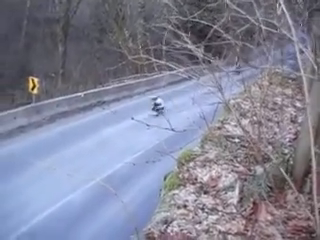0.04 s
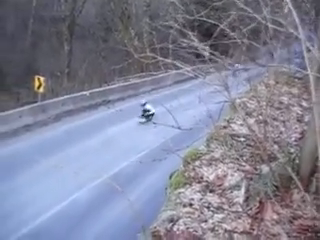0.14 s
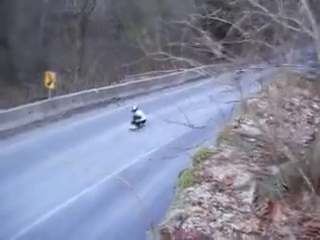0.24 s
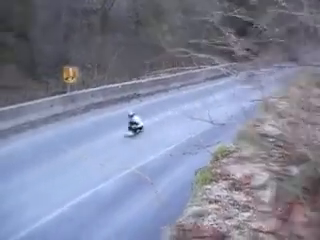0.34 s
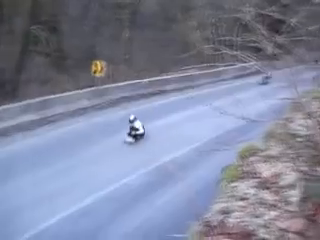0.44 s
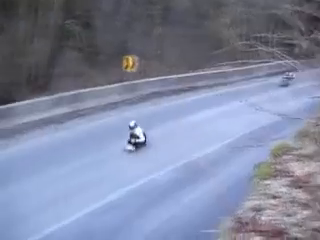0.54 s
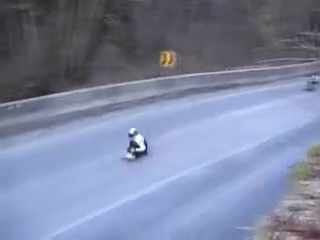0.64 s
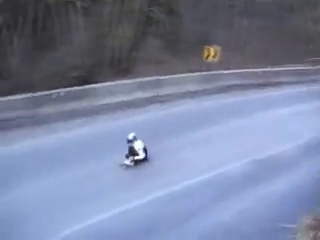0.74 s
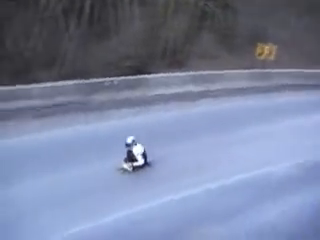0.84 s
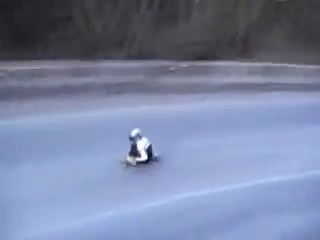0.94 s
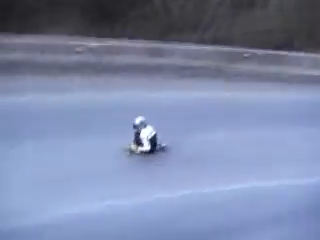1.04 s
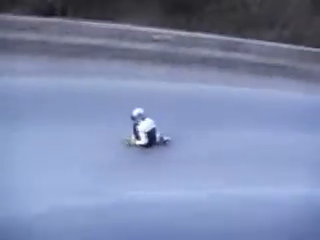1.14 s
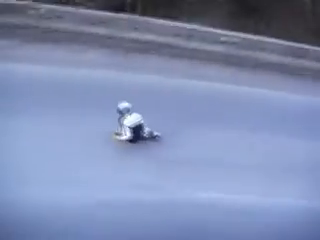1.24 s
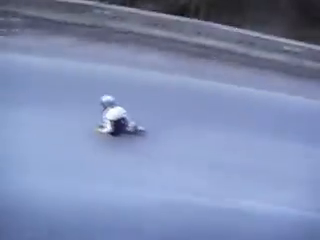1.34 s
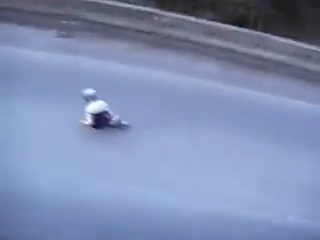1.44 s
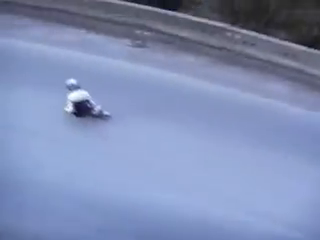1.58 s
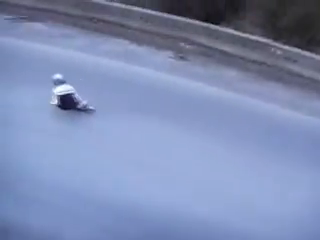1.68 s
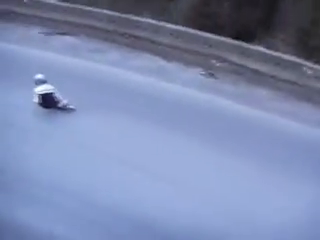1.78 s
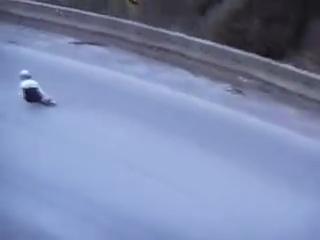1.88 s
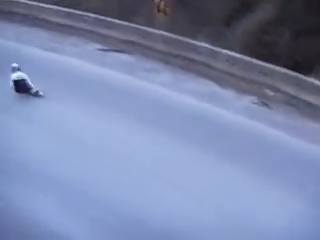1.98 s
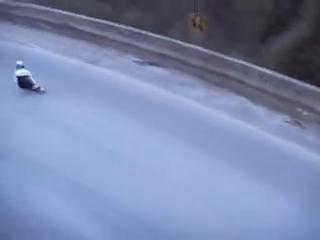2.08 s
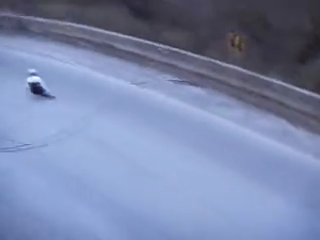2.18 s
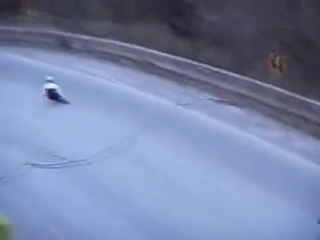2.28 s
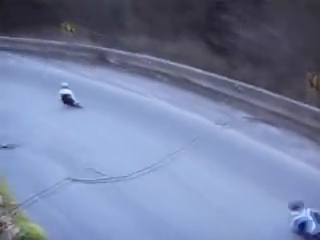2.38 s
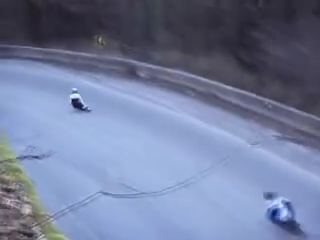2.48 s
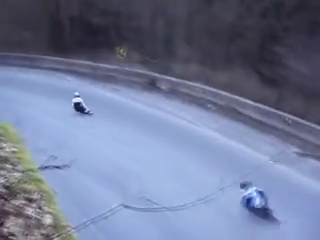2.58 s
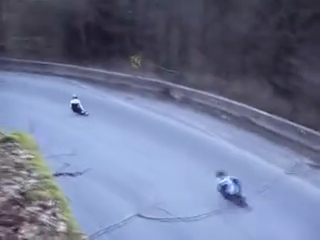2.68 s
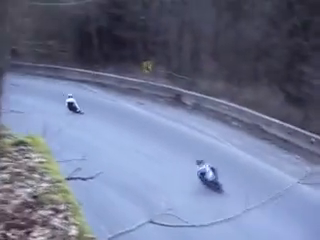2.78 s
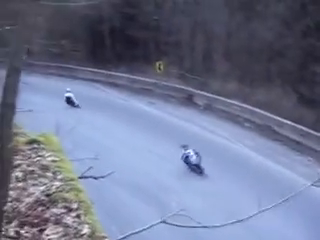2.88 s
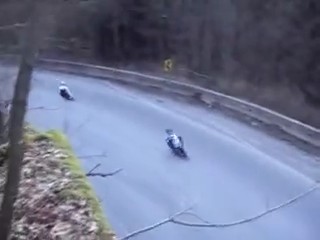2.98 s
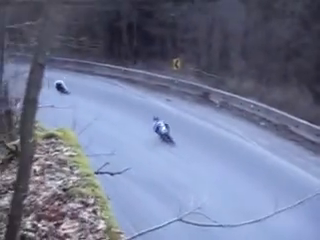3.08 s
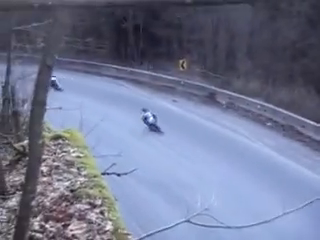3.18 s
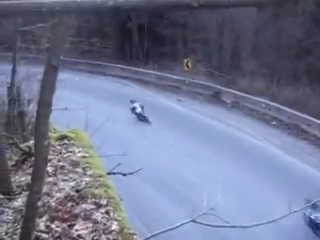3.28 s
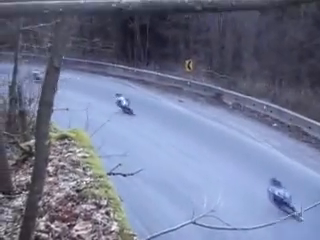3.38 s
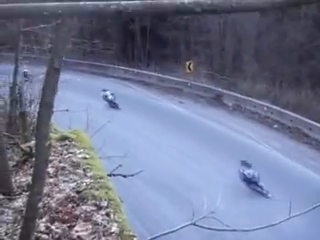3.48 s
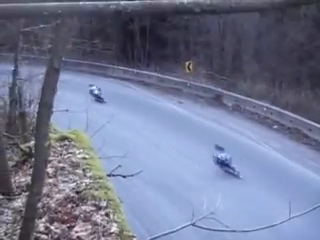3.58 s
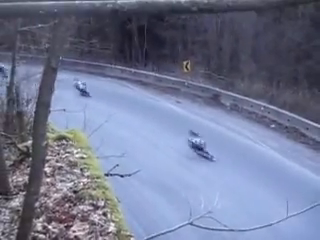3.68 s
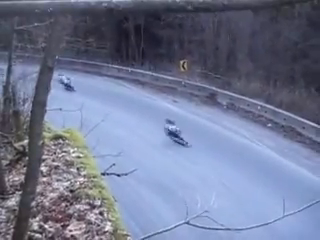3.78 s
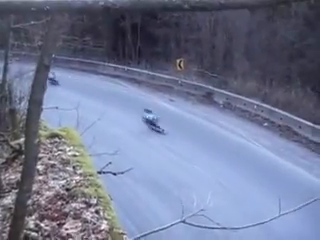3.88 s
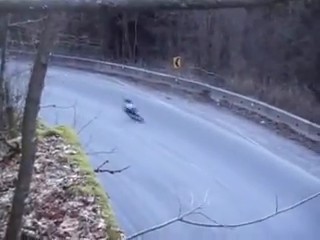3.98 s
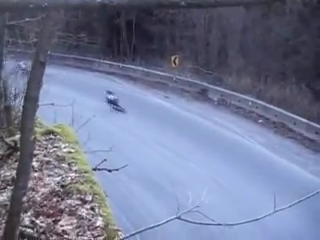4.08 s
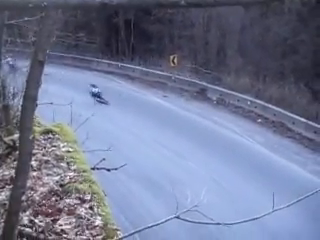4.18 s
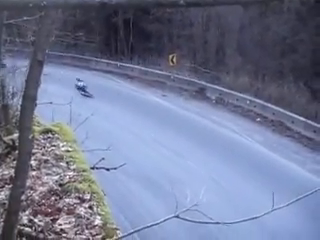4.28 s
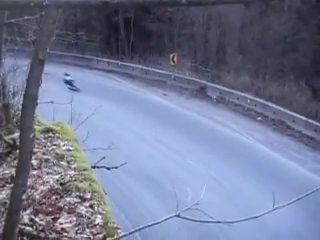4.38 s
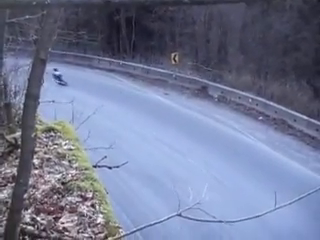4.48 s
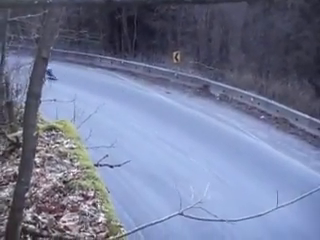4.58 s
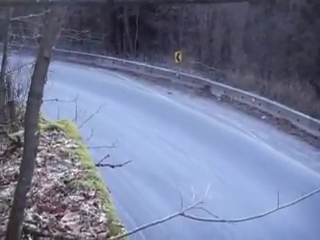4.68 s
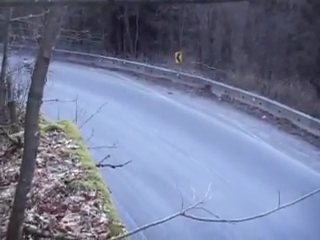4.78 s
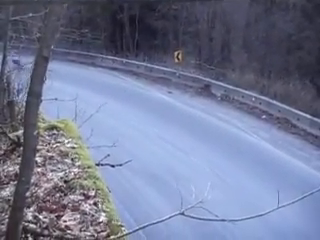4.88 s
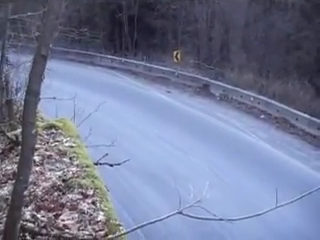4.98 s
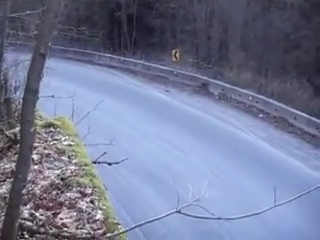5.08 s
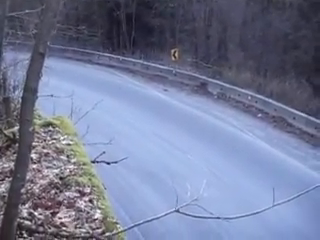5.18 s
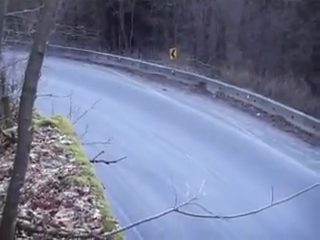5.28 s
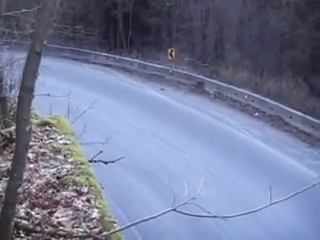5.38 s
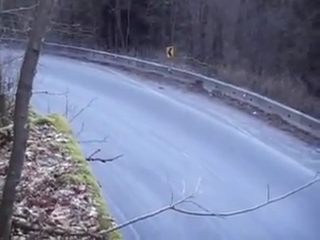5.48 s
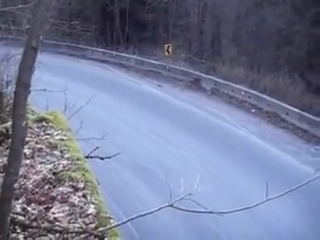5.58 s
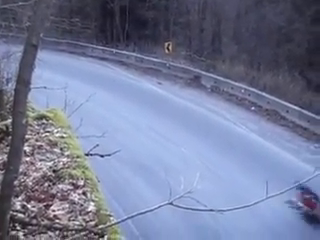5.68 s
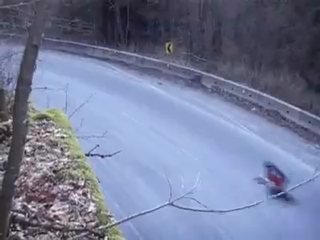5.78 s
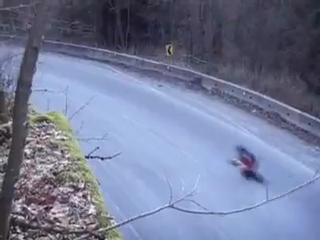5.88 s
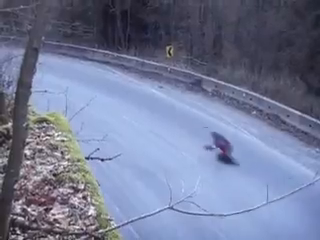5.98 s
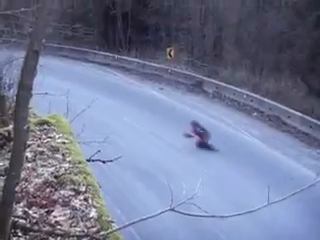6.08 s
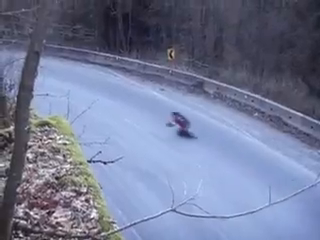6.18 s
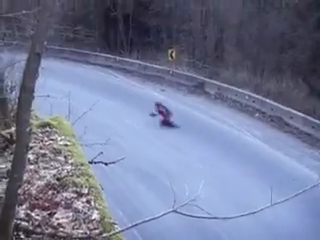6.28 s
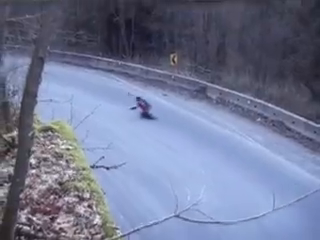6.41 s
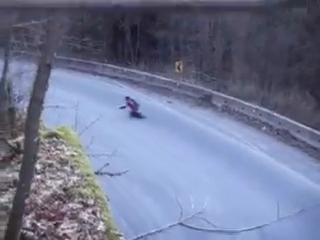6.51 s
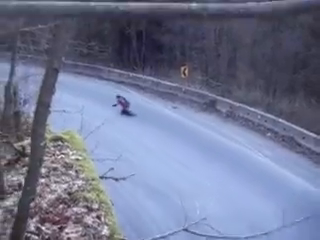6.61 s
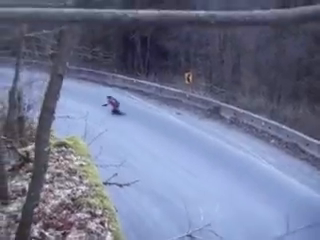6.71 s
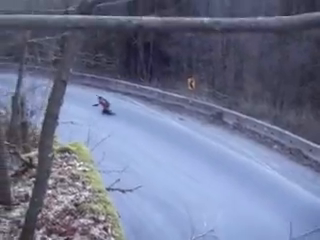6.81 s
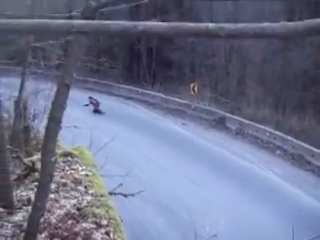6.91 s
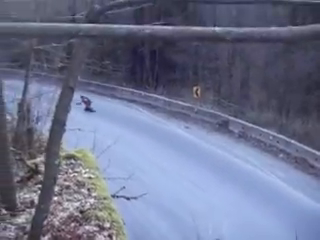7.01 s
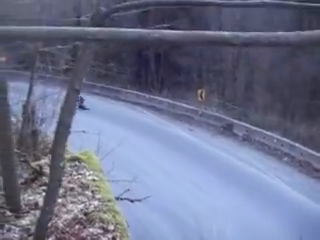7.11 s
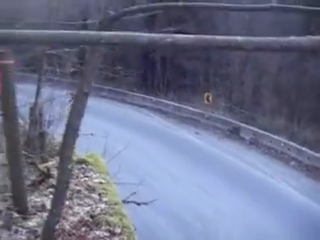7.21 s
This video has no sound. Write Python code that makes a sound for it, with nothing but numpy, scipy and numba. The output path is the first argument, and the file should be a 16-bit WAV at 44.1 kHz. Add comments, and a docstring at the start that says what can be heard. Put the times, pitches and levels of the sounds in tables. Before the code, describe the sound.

Continuous rolling noise of skateboard wheels on a wooded road: first a hissy rush, then a fuller, darker roar as more riders pass, a brief flutter of ringing bands, and a lull. One last rider approaches with hollow moaning chatter and a crunchy stone snap, passes and fades. Nearly mono, with fine crackle slightly stronger on the left; small handheld microphone.

```python
"""A growing roar of wheels is heard first: longboard riders sweep down an asphalt bend, past a leafy bank.
A group goes by, then one straggler. Random impacts of the road grain excite the wheels (roar),
the resonant decks (boom) and the treads (hiss); a fine bright crackle lies on top and single stones tick.
Single bands of the rolling noise swell, some ringing, some hissy; chattering wheels give a hollow moan.
The hiss also reflects off the road; the interference notch rises on approach and sinks on departure."""
import sys
import numpy as np
from scipy import signal
from scipy.fft import rfft, irfft, next_fast_len
from scipy.io import wavfile
from scipy.ndimage import uniform_filter1d, map_coordinates
from numba import njit

SR = 44100
rng = np.random.default_rng(int(sys.argv[2]) if len(sys.argv) > 2 else 0)


def int16_out(signal):
    """Quantize to a 16-bit WAV file."""
    q = np.round(np.clip(np.atleast_2d(signal).T, -1, 1) * 32767)
    wavfile.write(sys.argv[1], SR, q.astype(np.int16))


N = 319725
T = np.arange(N) / SR  # s


def undb(db):
    """Logarithmic level: decibels to amplitude gain."""
    return 10 ** (np.asarray(db) / 20)


def unit(x):
    """Normalisation: scale to rms 1."""
    return x / np.sqrt(np.mean(x ** 2))


def colour(x, points):
    """Spectral shaping: weight x by (f/Hz, level/dB) points, straight in log frequency; rms 1."""
    hz, db = np.transpose(points)
    size = next_fast_len(N)
    f = np.maximum(np.fft.rfftfreq(size, 1 / SR), 1)
    inside = undb(np.interp(np.log(f), np.log(hz), db))
    beyond = np.minimum(f / hz[0], 1) * np.minimum(hz[-1] / f, 1)
    spectrum = rfft(x, size) * inside * beyond ** 2  # 12 dB per octave past either end
    return unit(irfft(spectrum, size)[:N])


@njit
def svf(x, hz, width):
    """Second-order resonance: a state-variable band-pass whose centre and width may move."""
    y, band, low = np.empty(len(x)), 0., 0.
    for i in range(len(x)):
        g = np.tan(np.pi * hz[i] / SR)
        damping = width[i] / hz[i]
        v = (band + g * (x[i] - low)) / (1 + g * (g + damping))
        band, low = 2 * v - band, low + 2 * g * v
        y[i] = damping * v
    return y


def ring(x, hz, width):
    """Cascaded resonance: the same band-pass twice, for steep skirts; rms 1."""
    each_width = width / np.sqrt(np.sqrt(2) - 1)  # two passes narrow the band
    hz, each_width = np.ones(len(x)) * hz, np.ones(len(x)) * each_width
    once = svf(x + 1e-18, hz, each_width)
    return unit(svf(once, hz, each_width))


def walk(rate):
    """Slow random modulation: levels held 1 / rate s and slewed twice; spread near 1."""
    hold = int(SR / rate)
    steps = np.repeat(rng.standard_normal(N // hold + 1), hold)
    slewed = uniform_filter1d(uniform_filter1d(steps, hold), hold)
    return unit(slewed[:N])


def road_grain(rate, spread_db):
    """Random impulse excitation: asphalt chips strike so many times a second, unequally hard; rms 1."""
    struck = rng.random(N) < rate / SR
    force = rng.standard_normal(N) * undb(spread_db * rng.standard_normal(N))
    return unit(struck * force)


def swell(s, length):
    """Gaussian envelope: a smooth rise and fall around s; gain 1 at the top."""
    return np.exp(-2 * ((T - s) / length) ** 2)


FALLOFF = 2.1  # power of a far rider drops as time ** (-2 * FALLOFF)


def passing(s, coming_s, leaving_s):
    """Spreading loss: power of a rider who draws near, is loudest at s and rolls away."""
    away = (T - s) / np.where(T < s, coming_s, leaving_s)
    return (1 + away ** 2 / FALLOFF) ** -FALLOFF


HANDOVER_S, HANDOVER_LENGTH_S = 4.61, 0.49


def handover(group, last):
    """Equal-power crossfade: the group fades down the hill as the straggler comes in."""
    share = np.clip(.5 + (T - HANDOVER_S) / HANDOVER_LENGTH_S, 0, 1)
    return np.sqrt(1 - share) * group + np.sqrt(share) * last


BANK_HZ, BANK_WIDTH_HZ, BANK_LOSS = 640, 480, 0.37  # loss: share of amplitude absorbed at the centre
BANK_CLEAR_S, BANK_FADE_S = 1, 0.25


def behind_bank(x):
    """Band absorption: the leafy bank soaks up the low middle until the group comes round it."""
    hidden = 1 / (1 + np.exp((T - BANK_CLEAR_S) / BANK_FADE_S))
    absorbed = svf(x, np.ones(N) * BANK_HZ, np.ones(N) * BANK_WIDTH_HZ)
    return x - BANK_LOSS * hidden * absorbed


# Wheel roar spectrum of the group: f/Hz, level/dB
GROUP_ROAR = [(40, -50), (95, -46), (135, -21.5), (250, -15.5), (380, -10.5), (520, -5), (700, -4),
              (850, -3.5), (980, -0.5), (1100, 0.7), (1290, -1.7), (1500, 0), (1680, -2), (1880, -1.5),
              (2400, -10.5), (4200, -18.5)]
# Wheel roar spectrum of the straggler: f/Hz, level/dB
STRAGGLER_ROAR = [(50, -60), (120, -20.5), (260, -10), (370, -7), (520, 1), (810, 0), (940, 2), (1060, 0),
                  (1250, 2), (1450, 3), (1850, 1), (2130, 0), (2330, -3), (3900, -14.5)]
STRAGGLER_ROAR_DB = -1.5  # the broad roar under the wheel resonances


def wheels():
    """Broadband rolling noise: grain drums on the wheels; the straggler's have their own colour and rings."""
    group = behind_bank(colour(road_grain(rate=20000, spread_db=2.0), GROUP_ROAR))
    broad = colour(road_grain(rate=16000, spread_db=1.5), STRAGGLER_ROAR)
    straggler = undb(STRAGGLER_ROAR_DB) * broad + wheel_rings()
    return handover(group, straggler) * undb(0.51 * walk(rate=18))


# Steady boom: level against the roar, resonance and width; then the narrower width during a boom swell
DECK_DB, DECK_HZ, DECK_WIDTH_HZ, SWELL_WIDTH_HZ = -16, 580, 250, 138
DECK_FLUTTER_DB = 0.95  # rms; the boom rises and dips with the road
# Boom swells, when the low boom near 600 Hz grows louder and narrower:
# t/s, length/s, boom level/dB, resonance f/Hz
BOOM_SWELLS = [(1.25, 0.73, -42.5, 654), (2.14, 0.64, -49.5, 596), (2.742, 0.16, -41.5, 550),
               (3.385, 0.17, -41, 624), (4.507, 0.23, -54, 660), (4.946, 0.32, -40.5, 602),
               (5.212, 0.14, -40, 600), (5.85, 0.6, -44.5, 625), (6.351, 1, -51.5, 607)]


def deck(roar):
    """Forced resonance: the road shakes the board; at times its boom grows louder and narrower."""
    rolling_power = (undb(DECK_DB) * roar) ** 2
    swell_powers = [(undb(db) * swell(s, length)) ** 2 for s, length, db, _ in BOOM_SWELLS]
    power = np.array([rolling_power] + swell_powers)
    total = power.sum(axis=0)
    states = np.array([(DECK_HZ, DECK_WIDTH_HZ)] + [(hz, SWELL_WIDTH_HZ) for _, _, _, hz in BOOM_SWELLS])
    # rolling and each swell pull the resonance their way, in proportion to their power
    hz, width = states.T @ power / total
    boom = ring(road_grain(rate=9800, spread_db=3.0), hz, width)
    return undb(DECK_FLUTTER_DB * walk(rate=22)) * np.sqrt(total) * boom


NOTCH_HZ = (2700, 9550, 4000)  # riders far up the road, near, far down the road


def road_bounce(x, near_s, far_s, move_s, near_strength, far_strength):
    """Two-path interference: the road path lags half a period at the first notch, which rises, then sinks."""
    come, gone = (1 / (1 + np.exp((s - T) / move_s)) for s in (near_s, far_s))
    near = come * (1 - gone)
    shares = (1 - come, near, come * gone)
    delay_s = sum(share / (2 * hz) for share, hz in zip(shares, NOTCH_HZ))
    strength = far_strength + (near_strength - far_strength) * near
    late = map_coordinates(x, [np.arange(N) - SR * delay_s], order=3)
    return (x + strength * late) / np.sqrt(1 + strength ** 2)


# Tread hiss spectrum: f/Hz, level/dB
HISS = [(900, -25), (2000, -6), (2700, -5), (3200, -4), (3700, -5), (4600, -3), (5400, 0), (6100, 0.5),
        (6600, -2.5), (7300, -7.5), (8200, -14.5), (10000, -34.5)]
# come near at (s), go far at (s), time for the notch to move (s), strength near and far (amplitude ratio)
GROUP_BOUNCE, STRAGGLER_BOUNCE = (0.79, 2.88, 0.32, 0.0099, 0.24), (4.9, 5.8, 0.04, 0.084, 0.18)


def treads():
    """Contact noise: hiss where treads meet and leave the asphalt, uneven with the surface."""
    group = road_bounce(colour(road_grain(rate=27000, spread_db=1.3), HISS), *GROUP_BOUNCE)
    straggler = road_bounce(colour(road_grain(rate=27000, spread_db=1.3), HISS), *STRAGGLER_BOUNCE)
    return handover(group, straggler) * undb(0.5 * walk(rate=30))


# Fine bright crackle common to left and right: f/Hz, level/dB
CRACKLE = [(5500, -53), (7000, -25), (7800, -1), (8900, 4.5), (9450, -5), (10800, -6.5), (12000, -24),
           (13000, -48)]
# Fine bright crackle drawn separately for left and right: f/Hz, level/dB
SIDE_CRACKLE = [(5000, -44), (8300, -19), (9000, 18.5), (9500, 18.5), (10200, 9), (11000, 5), (12000, -20)]


def crackle(shared_db=-2.0, left_db=-2, right_db=-11):
    """Partial correlation: left and right partly unrelated above about 8.5 kHz, stronger on the left."""
    grains = [road_grain(rate=24000, spread_db=2.8) for _ in range(3)]
    shared = undb(shared_db) * colour(grains[0], CRACKLE)
    left = undb(left_db) * colour(grains[1], SIDE_CRACKLE)
    right = undb(right_db) * colour(grains[2], SIDE_CRACKLE)
    return (shared + np.array([left, right])) * undb(.5 * walk(rate=22))


# Short or long rises of the rolling noise in one band, some narrow and ringing, some broad and hissy:
# t/s, length/s, level/dB, centre f/Hz, width f/Hz
BAND_SWELLS = [(0.282, 0.71, -52.5, 975, 110), (0.99, 0.41, -37, 4700, 3000),
               (1.536, 0.099, -35.5, 6000, 1200), (1.95, 0.21, -39.5, 1090, 220),
               (2.13, 0.035, -36, 1650, 600), (2.701, 0.049, -37, 1000, 200), (2.83, 0.036, -37, 1220, 170),
               (3.04, .14, -50, 1480, 150), (3.112, 0.09, -41, 1085, 110), (3.056, 0.024, -36, 5800, 1400),
               (3.5, 0.15, -43, 1550, 200), (3.56, 0.24, -42.5, 3040, 442), (3.552, 0.23, -42.5, 1095, 129),
               (3.765, 0.032, -38, 1490, 450), (4.133, 0.06, -44, 6750, 2200),
               (5.15, 0.67, -47.5, 2800, 800), (5.193, 0.073, -39, 1490, 1000),
               (5.15, 0.34, -42.5, 4900, 2220), (5.477, 0.17, -45, 1400, 200), (5.62, 0.13, -47, 1860, 120),
               (5.82, 0.092, -45.5, 3260, 320), (5.9, 0.51, -49, 8150, 1600),
               (6.32, 0.09, -43.5, 1720, 260), (6.594, 0.032, -45, 1798, 350), (6.739, .08, -49.5, 920, 35),
               (7.052, 0.076, -44, 5720, 899), (7.1, 0.24, -50, 1710, 397)]


def band_swells():
    """Band-passed noise: the rolling noise rises and falls in one band at a time or in several together."""
    swells = np.zeros(N)
    for s, length, db, hz, width in BAND_SWELLS:
        swells += undb(db) * swell(s, length) * ring(rng.standard_normal(N), hz, width)
    # the very top is dulled
    return signal.sosfilt(signal.butter(4, 9000, fs=SR, output="sos"), swells)


MOAN_WANDER_HZ, MOAN_WAVER_DB = 18, 2.2  # rms
# Moans of wheels chattering in step with the board: t/s, length/s, level/dB, pitch f/Hz
MOANS = [(1.359, .04, -39.5, 590), (4.79, .14, -45.5, 647.3), (4.924, .045, -39, 643),
         (5.019, .12, -41, 642.2), (5.233, .1, -45.5, 600), (5.459, 0.078, -48.5, 645),
         (5.8, 0.222, -47, 650), (6.38, 0.41, -49, 612), (6.9, 0.11, -51, 608)]


def moan():
    """Frequency modulation: one hollow, wavering chatter tone slides from each swell's pitch to the next."""
    power = np.array([(undb(db) * swell(s, length)) ** 2 for s, length, db, _ in MOANS]) + 1e-18
    total = power.sum(axis=0)
    pitch = np.array([hz for _, _, _, hz in MOANS]) @ power / total
    chatter_hz = pitch + MOAN_WANDER_HZ * walk(rate=150)
    tone = np.sin(2 * np.pi * np.cumsum(chatter_hz) / SR)
    wavering = unit(tone * undb(MOAN_WAVER_DB * walk(rate=110)))
    return np.sqrt(total) * wavering


PING_HZ, PING_T60_S = 5030, .034
# Stones under a wheel, levels before the dulling:
# t/s, peak level/dB, centre f/Hz, width f/Hz, crunch t60/s, ping level/dB
TICKS = [(2.3635, -20, 7400, 3000, .007, -60), (2.3747, -16, 8800, 3000, .003, -60),
         (2.3775, -21, 6300, 1200, .008, -60), (2.4767, -20, 6200, 3500, .004, -60),
         (5.2233, -24, 6500, 1200, .028, -60), (5.225, -16.5, 5000, 3600, .002, -27),
         (5.2245, -26, 1700, 700, .025, -60), (5.2368, -27, 5400, 2600, .04, -28),
         (5.2665, -29, 1150, 600, .04, -60)]


def ticks(snap=6):
    """Impulse response: a stone snaps out from under the wheel, crunches for some milliseconds and may ping."""
    out, t = np.zeros(N), T[:SR // 8]
    for s, db, hz, width, t60, ping_db in TICKS:
        crunch = rng.standard_normal(len(t)) * np.exp(-np.log(1000) * t / t60)
        crack = ring(crunch + snap * (t == 0), hz, width)
        ping = np.sin(2 * np.pi * PING_HZ * t) * np.exp(-np.log(1000) * t / PING_T60_S)
        start = int(s * SR)
        out[start:start + len(t)] += undb(db) * crack / np.abs(crack).max() + undb(ping_db) * ping
    # the soft wheel dulls the very top of each tick
    return signal.sosfilt(signal.butter(4, 9000, fs=SR, output="sos"), out)


# pitch shift either way, middle of the swing, time to swing
DOPPLER_SHARE, DOPPLER_S, DOPPLER_TURN_S = 0.02, 5.37, 0.2
# Resonances of the straggler's wheels, at mid-swing: f/Hz, width f/Hz, level/dB against the roar
WHEEL_MODES = [(274, 74, -22.5), (956, 45, -17.5), (1200, 62, -13.5), (1534, 72, -14.5), (1843, 120, -9.5),
               (2350, 140, -16), (2920, 200, -15)]


def wheel_rings():
    """Modal excitation with Doppler shift: the road rings the wheels, and the pitch sinks as they go by."""
    doppler = 1 - DOPPLER_SHARE * np.tanh((T - DOPPLER_S) / DOPPLER_TURN_S)
    grain = road_grain(rate=16000, spread_db=1.0)
    return sum(undb(db) * ring(grain, hz * doppler, width) for hz, width, db in WHEEL_MODES)


HISS_SPREAD = 1.34  # the hiss swells and fades so many times more slowly than the roar
# Riders going by: loudest at t/s, coming time/s, leaving time/s (both for roar and crackle),
# wheel roar level/dB, tread hiss level/dB, fine crackle level/dB
RIDERS = [(1.38, 0.8, 1.3, -37.5, -32.5, -50), (2.77, 1.22, 0.78, -35, -38.5, -49),
          (3.58, 0.16, 0.26, -42.5, -41.5, -50.5), (5.98, 1.23, 0.69, -38.5, -41, -53)]


def scene():
    """Incoherent summation: the riders' powers add; all but part of the crackle is mono."""
    roar_power, hiss_power, crackle_power = np.zeros((3, N))
    for s, coming, leaving, roar_db, hiss_db, crackle_db in RIDERS:
        near = passing(s, coming, leaving)
        roar_power += undb(roar_db) ** 2 * near
        hiss_power += undb(hiss_db) ** 2 * passing(s, coming * HISS_SPREAD, leaving * HISS_SPREAD)
        crackle_power += undb(crackle_db) ** 2 * near
    roar = np.sqrt(roar_power)
    rolling = roar * wheels() + behind_bank(deck(roar))
    surface = np.sqrt(hiss_power) * treads() + np.sqrt(crackle_power) * crackle()
    return rolling + surface + band_swells() + moan() + ticks()


TOP_HZ = 12200


def record(dry):
    """Band limiting: a small microphone thins the bass and cuts the top."""
    thin = signal.sosfilt(signal.butter(3, 105, "high", fs=SR, output="sos"), dry)
    return signal.sosfilt(signal.ellip(10, .2, 70, TOP_HZ, fs=SR, output="sos"), thin)


dry = scene()
out = record(dry)
int16_out(out)
```